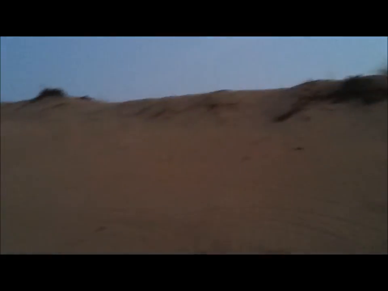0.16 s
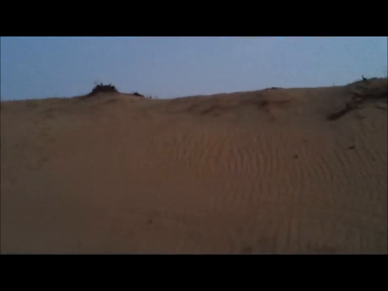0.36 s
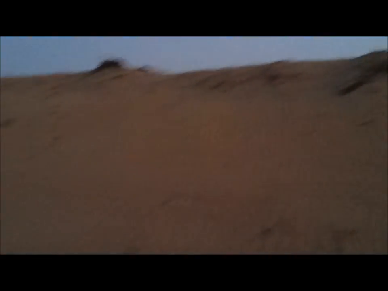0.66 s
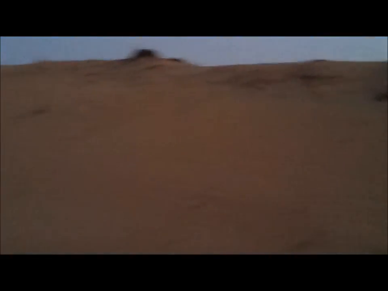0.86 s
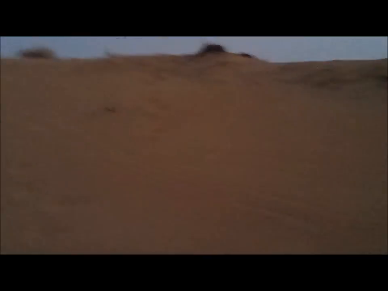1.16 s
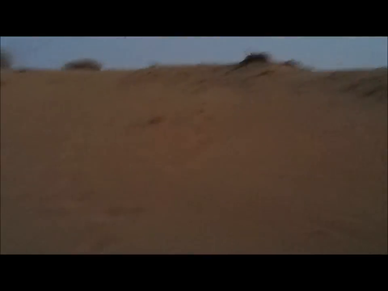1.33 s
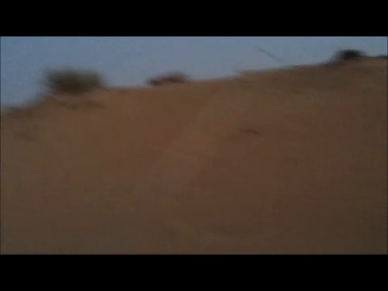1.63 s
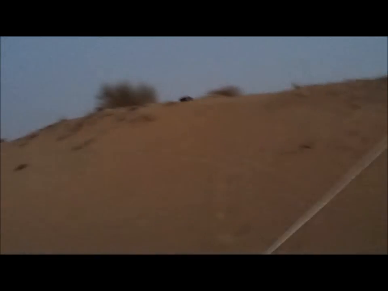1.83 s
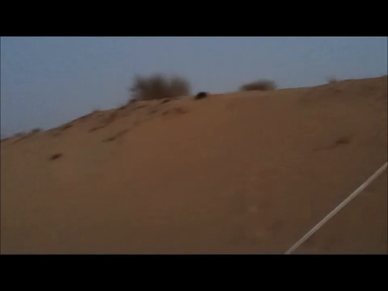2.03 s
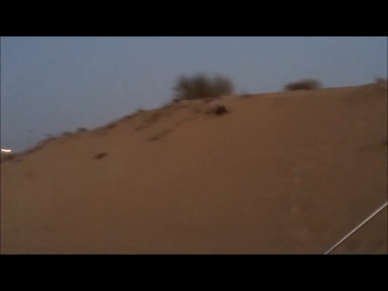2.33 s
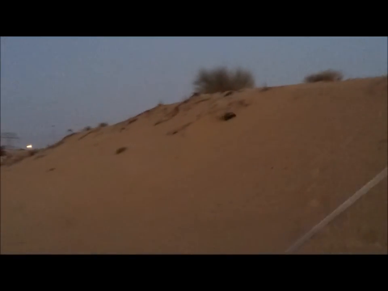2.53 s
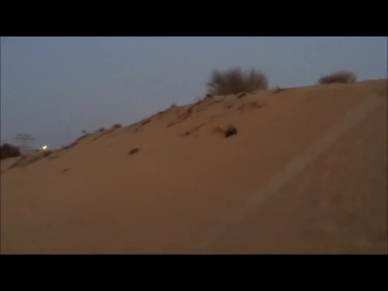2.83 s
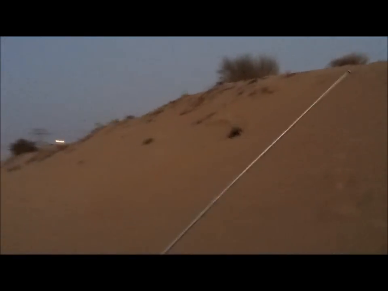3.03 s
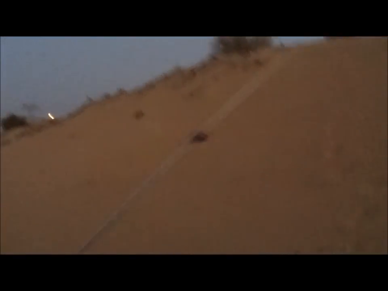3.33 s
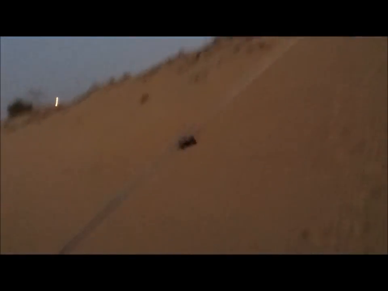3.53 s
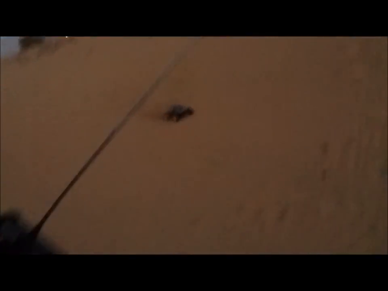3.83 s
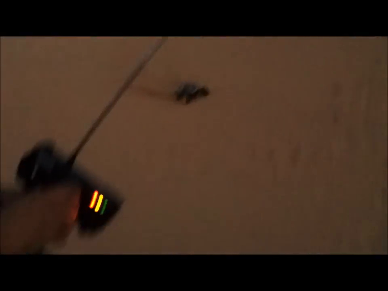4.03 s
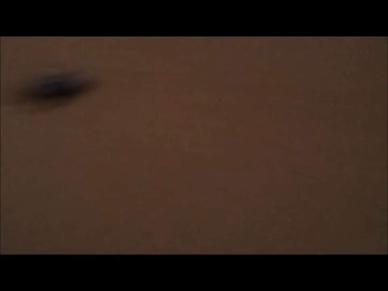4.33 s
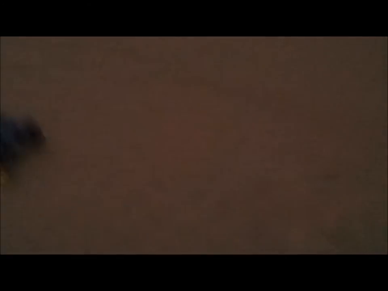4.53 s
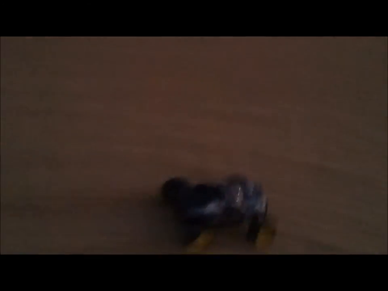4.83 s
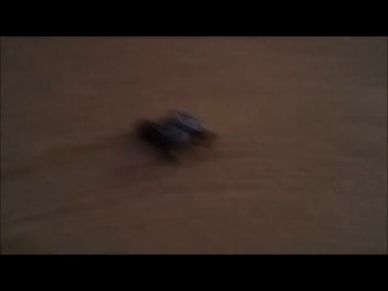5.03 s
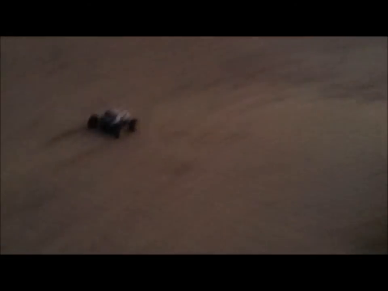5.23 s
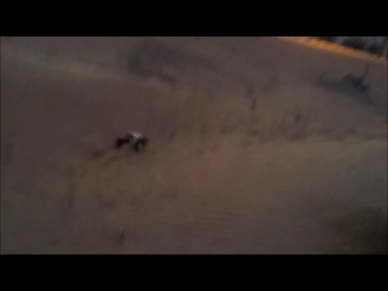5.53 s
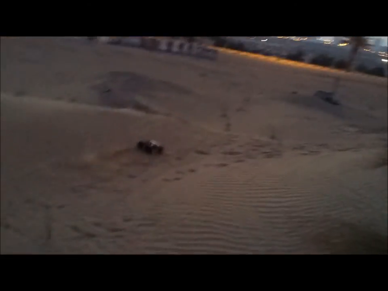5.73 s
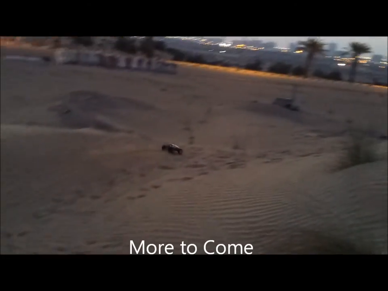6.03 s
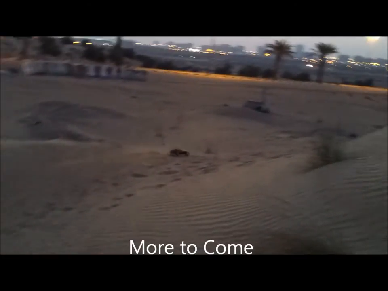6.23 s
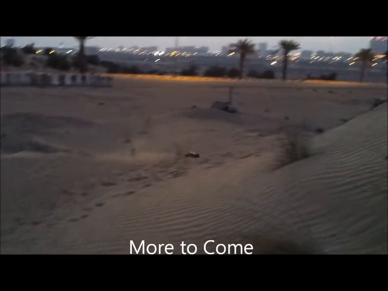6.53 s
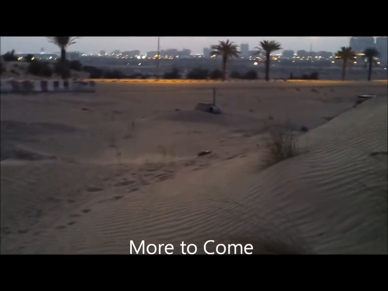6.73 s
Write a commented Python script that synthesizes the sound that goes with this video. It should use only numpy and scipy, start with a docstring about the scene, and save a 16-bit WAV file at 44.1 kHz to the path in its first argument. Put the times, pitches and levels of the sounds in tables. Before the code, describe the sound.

A toy truck with an electric motor runs over loose sand. At first heavy wind pops cover a weak whir; then the gears whine and hiss, growing into a harsh rush mixed with tyre noise. It coasts down with fine clicking, almost stops, and starts again quietly in stuttering bursts. Close hand-held stereo pickup, the gears brighter on the right, with light handling knocks and faint air hiss.

```python
"""Open sandy ground: a small electric toy truck spins up, rushes past, coasts and pulls away in bursts of throttle.
Gears are patchy noise plus a ringing band; mesh whine, squeaks and motor moan are narrow noise on moving pitches.
Tyres and chassis are two more noise bands. Gusts are lumpy low noise with pops on the two ports of a hand-held
camera; the left port muffles gears and whine. Grit clicks, case knocks and faint air noise complete the scene."""
import sys
import numpy as np
from scipy import signal
from scipy.fft import rfft, irfft, next_fast_len
from scipy.io import wavfile
from scipy.ndimage import uniform_filter1d, map_coordinates

SR = 44100
rng = np.random.default_rng(int(sys.argv[2]) if len(sys.argv) > 2 else 0)


def wav_out(sig):
    """Save sig, one row per channel (or a flat mono array), as 16-bit PCM at SR to the path in sys.argv[1]."""
    wavfile.write(sys.argv[1], SR, np.round(np.clip(np.atleast_2d(sig).T, -1, 1) * 32767).astype(np.int16))


N = 303187
T = np.arange(N) / SR


def amp(db):
    """Amplitude factor of a level in dB."""
    return 10 ** (np.asarray(db) / 20)


def unit(x):
    """Scaled so that the mean of the ports has rms 1."""
    return x / np.sqrt(np.mean(np.atleast_2d(x).mean(0) ** 2))


def along(points, hz):
    """(Hz, value) points interpolated on a log frequency axis."""
    f, v = np.transpose(points)
    return np.interp(np.log(hz + 1), np.log(f + 1), v)


def curves(rows):
    """One value per sample for each column after the time."""
    s, *cols = np.transpose(rows)
    return [np.interp(T, s, c) for c in cols]


def wobble(rate_hz, size=N):
    """A smooth random curve with rate_hz knots a second."""
    knots = rng.standard_normal(int(size * rate_hz / SR) + 4)
    return map_coordinates(knots, [T[:size] * rate_hz])


def filtered(x, response):
    """x times a complex response of frequency."""
    m = next_fast_len(N + SR // 4)
    return irfft(rfft(x, m) * response(np.fft.rfftfreq(m, 1 / SR)), m)[..., :N]


def sides(pan_db):
    """Left and right gains of constant summed power."""
    left = amp(pan_db)
    return 2 * np.array([left, left ** 0]) / np.hypot(1, left)


def tilt(half_db):
    """Left port up, right port down by half_db."""
    return amp([[half_db], [-half_db]])


def window(t0, t1, edge_s):
    """1 between t0 and t1, with sloped ends."""
    return np.clip(np.minimum(T - t0, t1 - T) / edge_s + .5, 0, 1)


def fuzzy(hz, width_hz):
    """Narrow noise of rms 1 on a moving pitch: a tone whose size and phase wander."""
    turn = 2 * np.pi * np.cumsum(hz) / SR
    in_phase = wobble(width_hz, size=len(hz)) * np.cos(turn)
    quadrature = wobble(width_hz, size=len(hz)) * np.sin(turn)
    return unit(in_phase + quadrature)


# Phase of the left port against the right. Each row: frequency in Hz, phase in radians (negative is late).
LAG = [(200, -.3), (1460, -1.2), (1890, -2.8), (2500, -3.1), (3530, -5), (14000, -13)]


def left_lag(hz):
    """Path difference between the ports as a phase factor."""
    return np.exp(1j * along(LAG, hz))


# Colouring of the left port. Each row: frequency in Hz, gain in dB.
MUFFLE = [(2000, 8), (3000, 1.5), (4200, -34), (5500, -19), (7500, -24), (9500, -34), (11000, -5.5),
          (14000, -7)]


def left_muffle(hz):
    """Treble loss at the left port."""
    return amp(along(MUFFLE, hz))


# Likeness of the ports. Each row: frequency in Hz, left-right likeness from 0 to 1.
ALIKE = [(300, 1), (700, 1), (1500, 0.75), (2500, 0.8), (3600, 0.8), (6000, .7), (11000, 0.4)]


def rush(spectrum, patchy_db, bins, frames):
    """Noise partly alike at both ports, the left late, with random gain patches over time and frequency."""
    z = signal.stft(rng.standard_normal((2, N)), nperseg=512)[2]
    field = uniform_filter1d(rng.standard_normal(z.shape[1:]), int(bins), 0)
    field = uniform_filter1d(field, int(frames), 1)
    patches = amp(patchy_db * field / field.std())
    shared, separate = signal.istft(z * patches, nperseg=512)[1][:, :N]

    def gain(hz):
        return amp(along(spectrum, hz))

    def alike(hz):
        return np.clip(along(ALIKE, hz), 0, 1)

    left = filtered(shared, lambda hz: gain(hz) * alike(hz) * left_lag(hz))
    left += filtered(separate, lambda hz: gain(hz) * np.sqrt(1 - alike(hz) ** 2))
    return np.array([left, filtered(shared, gain)])


# Truck loudness. Each row: time in seconds, gear hiss in dB, tyre rush in dB.
DRIVE = [(0, -48, -54), (.31, -46, -53), (.44, -53, -53), (.57, -40, -47), (.88, -34.5, -39),
         (1.15, -36.5, -42), (1.9, -29.5, -33.5), (2.14, -23, -30.5), (2.45, -17, -23.5), (2.6, -14, -22),
         (2.89, -18, -24.5), (2.95, -19.5, -32.5), (3.15, -25, -32.5), (3.55, -28.5, -38.5),
         (4.0, -33.5, -41.5), (4.13, -36, -46.5), (4.23, -48, -45.5), (4.46, -49, -46.5),
         (4.53, -56, -51.5), (4.73, -39.5, -47), (5.05, -44, -51), (5.3, -43, -58), (5.9, -44.5, -52.5),
         (5.98, -40.5, -50.5), (6.25, -45, -48.5), (6.31, -40, -48), (6.45, -45.5, -51), (6.87, -45, -51)]
# Lifted throttle. Each row: start in seconds, end in seconds, drop in dB.
LIFTS = [(4.842, 4.881, 10.5), (4.878, 4.91, 4), (5.225, 5.293, 14), (5.305, 5.344, 15), (5.342, 5.364, 3),
         (6.672, 6.726, 5.5)]


def gear_level_db():
    """Gear hiss level, sinking while the throttle is lifted."""
    drop_db = sum(db * window(t0, t1, 0.0086) for t0, t1, db in LIFTS)
    return curves(DRIVE)[0] - drop_db


# Shaft turning out of true. Each row: time in seconds, turns per second, flare in dB before random scaling.
SHAFT = [(.5, 50, 1), (1.0, 56, 2), (2.3, 57, 1), (2.8, 64, 2.5), (3.31, 63, 3), (3.55, 60.5, 2),
         (3.83, 57.5, 1.5), (4.2, 59, 1.5), (4.65, 39.5, 1.5), (5.13, 40.5, 3.5), (5.48, 47, 2.5),
         (6.09, 44.5, 3), (6.4, 47.5, 3.5), (6.87, 44.5, 2.5)]


def flare():
    """Mesh gain that swells once a shaft turn by an uneven amount."""
    rate_hz, depth_db = curves(SHAFT)
    turn = 2 * np.pi * np.cumsum(rate_hz * (1 + .06 * wobble(15))) / SR
    uneven = 0.5 + 0.39 * wobble(25)
    return amp(depth_db * uneven * np.cos(turn))


# Gear hiss spectrum. Each row: frequency in Hz, density in dB per Hz.
GEARS = [(2000, -57), (2700, -8), (4100, -5), (5500, -3.5), (6900, 3), (8400, 3), (10000, -8),
         (12400, -16.5), (14500, -14)]
# Truck facing camera. Each row: time in seconds, gears left-right in dB, chassis drone over the tyres in dB.
FACING = [(0, -14, -24), (.6, -20, -18), (2.2, -25, -2.5), (2.55, -6, -25), (2.9, -1.5, -12),
          (3.2, -6.5, -8), (4.2, -6, 4), (4.9, -11, -6.5), (6.87, -10, -17)]
# Gearbox resonance. Each row: time in seconds, centre in Hz, level over the hiss in dB.
RING = [(0, 7500, -32), (.6, 7600, -4.5), (.95, 8020, -2.5), (1.2, 7530, -11), (2.25, 7450, -26),
        (2.39, 6750, -1.5), (2.7, 7280, -39), (3.7, 7800, -25), (4.0, 6780, -5), (4.2, 7040, -25),
        (4.6, 6930, -27), (4.72, 7000, 1), (4.82, 7630, 2), (4.92, 6600, -1.5), (5.05, 6530, 2),
        (5.2, 6890, -2), (5.4, 7100, -11), (5.7, 7150, 2), (5.98, 7410, -6), (6.12, 6950, 1.5),
        (6.4, 7000, -7.5), (6.87, 6900, -4)]


def gears():
    """Uneven teeth chatter as patchy hiss; the gearbox rings in a broad drifting band."""
    chatter = flare() * amp(.8 * wobble(40) + 1.2 * wobble(300))
    hiss = chatter * rush(GEARS, patchy_db=3.1, bins=3, frames=5)
    ring_hz, ring_db = curves(RING)
    ring_tone = fuzzy(ring_hz + 130 * wobble(20), width_hz=850)
    ring = chatter * amp(2 * wobble(40) + ring_db) * ring_tone
    pan_db = curves(FACING)[0]
    out = amp(gear_level_db()) * (hiss / hiss[1].std() + ring) * sides(pan_db)
    out[0] = filtered(out[0], left_muffle)
    return out


# Tyre rush spectrum. Each row: frequency in Hz, density in dB per Hz.
TYRES = [(600, -2), (900, 1.5), (1250, 4), (1600, 3.5), (2000, 1), (2700, -5), (3600, -14), (6000, -17.5),
         (8000, -31)]
# Sand echo hollowing the far tyre rush. Each row: frequency in Hz, gain in dB.
GROUND = [(300, -3), (600, 8), (1150, -9.5), (1700, 5.5), (2300, 5), (4000, -9)]
FAR_FROM_S, FAR_FADE_S = 5.32, 0.29
TREAD_PATCHY_DB = 2.2


def tyres():
    """Tread blocks churn sand ripples: bumpy noise, comb-coloured by the sand echo once far off."""
    bumps = amp(0.53 * wobble(10) + 1.6 * wobble(120))
    churn = bumps * rush(TYRES, patchy_db=TREAD_PATCHY_DB, bins=1.5, frames=8)
    near = amp(curves(DRIVE)[1]) * unit(churn * tilt(1.8))
    hollow = filtered(near, lambda hz: amp(along(GROUND, hz)))
    far = np.clip((T - FAR_FROM_S) / FAR_FADE_S, 0, 1)
    return near + far * (hollow - near)


# Chassis drone spectrum. Each row: frequency in Hz, density in dB per Hz.
CHASSIS = [(250, -12.5), (500, -9), (700, 0.5), (850, -0.5), (1100, -36)]


def chassis():
    """Body drone: a low-mid noise band set against the tyre level."""
    level_db = curves(DRIVE)[1] + curves(FACING)[1]
    drone = rush(CHASSIS, patchy_db=TREAD_PATCHY_DB, bins=2.2, frames=13)
    return amp(level_db) * unit(drone * tilt(1.2))


# Buffeting. Each row: time in seconds, level in dB, left-right in dB.
WIND = [(0, -34, 28), (.3, -30.5, 22), (.52, -28, 18), (.8, -23, 11), (.89, -24.5, 10), (.93, -31.5, -6),
        (.99, -31.5, -1), (1.08, -28.5, 18), (1.27, -22, -3), (1.32, -37, 10), (1.52, -41, -6),
        (1.77, -25, 19), (1.88, -40.5, 7), (2.36, -30.5, 5), (2.58, -19, 14), (2.71, -24.5, 1),
        (2.765, -17.5, 8), (2.95, -24, 3), (2.99, -18.5, 15), (3.05, -28, 11), (3.085, -36, 5),
        (3.4, -45, -3), (3.95, -35.5, 1), (4.1, -45.5, 6), (4.65, -48.5, 3), (5.2, -47, 12.5),
        (6.1, -47, 0.5), (6.6, -42.5, 12), (6.87, -44.5, 9)]
# Puffs over the buffeting. Each row: centre in seconds, length in seconds, rise in dB.
PUFFS = [(2.12, 0.03, 15), (2.273, 0.046, 6.5), (4.253, 0.082, 13), (4.797, 0.15, 11.5), (4.994, 0.047, 12),
         (5.205, 0.034, 9), (5.273, 0.028, 13), (5.385, 0.086, 17), (5.472, 0.094, 8), (5.777, 0.22, 6),
         (6.409, 0.058, 4), (6.694, 0.12, 7.5)]
# Buffeting spectrum. Each row: frequency in Hz, density in dB per Hz.
GUST = [(20, -12), (50, 0), (80, 2.5), (120, 4.5), (250, -2.5), (400, -11), (700, -28), (1500, -94),
        (3000, -79)]
# Rumble spectrum. Each row: frequency in Hz, density in dB per Hz.
RUMBLE = [(20, -2.5), (40, 1.5), (90, 1.5), (160, -9), (300, -43), (600, -57)]
EDDY_DB, EDDY_HZ = 2, 14


def wind():
    """Turbulence: lumpy noise, separate at each port, over a steadier rumble, with pops."""
    base_db, pan_db = curves(WIND)
    puff_db = sum(rise_db * np.exp(-(2 * (T - s) / length_s) ** 2) for s, length_s, rise_db in PUFFS)
    db = base_db + puff_db
    lumps = amp(np.array([1.7 * wobble(22) + 3 * wobble(60) for _ in "LR"]))
    noise = filtered(lumps * rng.standard_normal((2, N)), lambda hz: amp(along(GUST, hz)))
    rumble = filtered(rng.standard_normal((2, N)), lambda hz: amp(along(RUMBLE, hz)))
    buffets = amp(db + EDDY_DB * wobble(EDDY_HZ)) * sides(pan_db) * noise / noise.std()
    # rumble follows only 0.27 of the wind's dB swing
    steady = amp(0.27 * db + [[-22], [-27]]) * rumble / rumble.std()
    return buffets + steady + pops(base_db)


# Air slapping a port. Each row: time in seconds, push in dB, snap over the push in dB, length in seconds,
# port (0 left, 1 right).
POPS = [(0.016, -7.5, -14.5, 0.0038, 0), (0.059, -20.5, -11.5, 0.013, 0), (0.094, -7, -24, 0.0024, 0),
        (0.115, -2.5, -12.5, 0.0034, 0), (0.161, -12, -34, 0.0096, 0), (0.2, -7.5, -17, 0.0016, 0),
        (0.221, -12, -29, 0.0034, 0), (0.248, -5.5, -20, 0.0022, 0), (0.27, -11.5, -31, 0.004, 0),
        (0.286, -8.5, -5.5, 0.0054, 0), (0.298, -14.5, -8, 0.0028, 0), (0.319, -9, -24, 0.0022, 0),
        (0.336, -0.5, -17.5, 0.0041, 0), (0.344, -2, -16, 0.0025, 0), (0.391, -10.5, -10, 0.0042, 0),
        (0.448, -4, -12.5, 0.0066, 0), (0.504, -5, -20, 0.002, 0), (0.578, -10, -12, 0.0055, 0),
        (0.602, -8, -22, 0.0034, 0), (0.622, -8, -11.5, 0.01, 0), (0.65, -12, -27, 0.0056, 0),
        (0.671, -3, -13, 0.0092, 0), (0.723, -10.5, -15.5, 0.012, 0), (0.784, -25.5, -0.5, 0.033, 0),
        (0.812, -12, -32, 0.017, 1), (0.824, -12.5, -11, 0.0029, 0), (0.878, -17, -1.5, 0.012, 0),
        (0.95, -12, -12, 0.0074, 1), (0.969, -2.5, -25, 0.0027, 1), (1.143, -7.5, -14, 0.0075, 1),
        (1.091, -22, -8.5, 0.0077, 0), (1.16, -14.5, -6, 0.01, 0), (1.188, -16, -8, 0.0064, 0),
        (1.213, -22, 2.5, 0.0031, 0), (1.234, -15, -10, 0.0049, 0), (1.261, -18.5, -9.5, 0.014, 0),
        (1.282, -13, -8.5, 0.0063, 0), (1.666, -16, -6, 0.0054, 0), (1.765, -15.5, -9, 0.01, 0),
        (2.517, -8.5, -6, 0.011, 0), (2.774, -15, -7, 0.022, 0), (2.807, -11, -8, 0.014, 0),
        (2.978, -14, -8.5, 0.0062, 1), (3.001, -15.5, -3, 0.0053, 0), (5.385, -22, -18, 0.0062, 0)]
SMALL_PER_S, RIGHT_SHARE = 12, 0.27
SMALL_DB, SMALL_SPREAD_DB, SMALL_SNAP_DB = 11, 2, -17  # SMALL_DB is over the wind level
SMALL_MEDIAN_S = 0.007


def all_pops(wind_db):
    """The listed pops plus random smaller ones as strong as the wind of the moment."""
    count = int(SMALL_PER_S * N / SR)
    u, g = rng.random((count, 2)), rng.standard_normal((count, 3))
    s = u[:, 0] * T[-1]
    push_db = np.interp(s, T, wind_db) + SMALL_DB + SMALL_SPREAD_DB * g[:, 0]
    snap_db = SMALL_SNAP_DB + SMALL_SPREAD_DB * g[:, 1]
    length_s = SMALL_MEDIAN_S * 1.8 ** g[:, 2]
    port = u[:, 1] < RIGHT_SHARE
    return np.vstack([POPS, np.transpose([s, push_db, snap_db, length_s, port])])


# Snap spectrum. Each row: frequency in Hz, density in dB per Hz.
SNAP = [(150, -20), (350, 0), (700, -5), (1000, -12), (1600, -21), (2300, -38), (4000, -60)]
WAKE_DB, WAKE_S = -6.5, 0.015  # slow swing after each pop, dB over the push
WAKE_BASE_HZ = 74  # times 0.6 to 1.6 at random


def pops(wind_db):
    """Each pop is a pressure push, a slow wake and a noise snap at one port."""
    out = np.zeros((2, N))
    snap = filtered(rng.standard_normal(N), lambda hz: amp(along(SNAP, hz)))
    for s, push_db, snap_db, length_s, port in all_pops(wind_db):
        pitch, phase = rng.random(2)
        near = slice(max(round((s - .05) * SR), 0), round((s + .05) * SR))
        t = T[near] - s
        swing = np.cos(2 * np.pi * ((150 + 120 * pitch) * t + 0.18 * phase))
        push = np.exp(-(t / (np.where(t < 0, .4, 1.1) * length_s)) ** 2) * swing
        after = np.maximum(t, 0)
        wake = np.sin(2 * np.pi * WAKE_BASE_HZ * (.6 + phase) * after)
        wake *= amp(WAKE_DB) * np.exp(-(after / WAKE_S) ** 2)
        # sharp front, slower tail
        burst = np.exp(-(t / (np.where(t < 0, .35, .75) * length_s)) ** 2) * snap[near]
        burst *= np.sqrt(length_s * SR / np.sum(burst ** 2))  # rms 1 over the pop length
        out[round(port), near] += amp(push_db) * (push + wake + amp(snap_db) * burst)
    return out


# Air noise spectrum. Each row: frequency in Hz, density in dB per Hz.
AIR = [(200, -51), (500, 5), (1700, -0.5), (3000, -7), (14000, -18.5)]


def evening_air():
    """Faint steady broadband noise of the evening air."""
    return amp(-52) * unit(rush(AIR, patchy_db=2, bins=6, frames=12))


# Drive squeaks. Each row: centre in seconds, pitch in Hz, length in seconds, level in dB.
SQUEAKS = [(0.22, 4960, 0.033, -42), (0.286, 4650, 0.042, -45), (0.323, 9200, 0.014, -37),
           (0.458, 4750, 0.017, -47), (0.027, 1720, 0.019, -53), (0.478, 1730, 0.042, -53),
           (0.51, 1980, 0.046, -51), (1.015, 4870, 0.063, -34.5), (1.157, 4930, 0.19, -33),
           (1.16, 6400, 0.33, -33.5), (3.119, 8570, 0.15, -28), (3.43, 8870, 0.1, -37)]


def squeaks():
    """Short drive squeaks: bell-shaped bursts of narrow noise."""
    out = np.zeros(N)
    for s, hz, length_s, db in SQUEAKS:
        near = slice(round((s - length_s) * SR), round((s + length_s) * SR))
        t = T[near] - s
        out[near] += amp(db) * np.exp(-(2 * t / length_s) ** 2) * fuzzy(hz + 0 * t, width_hz=.085 * hz)
    return out


# Mesh whine. Each row: time in seconds, pitch in Hz, level over the hiss in dB, octave over the hiss in dB.
WHINE = [(.5, 2701, -30, -25), (.535, 2910, -8, -12), (.552, 2990, 9, -9), (.562, 3100, -9, -5),
         (.585, 3590, -10, 4), (.605, 3880, -8, 2), (.63, 3930, 0, -3), (.7, 3920, -1.5, 1),
         (.8, 4200, -5, -12), (.86, 4150, -9, 4), (.95, 4280, -7, -13), (1.27, 4096, -11, 2.5),
         (2.2, 4064, -10, -40), (2.9, 3850, -15.5, -39), (4.1, 3865, -21, -20), (4.3, 3590, -27, -23.5),
         (4.9, 3110, -32, -18), (5.05, 3030, -16, 1), (5.21, 3390, -17, -6), (5.39, 3120, -10, -18),
         (5.5, 3270, -8, -6), (5.56, 3580, -11, 7.5), (5.76, 3650, -8, -2), (5.9, 3700, -16, -4),
         (6.07, 3750, -7, -4), (6.16, 3910, -8, -10), (6.26, 4170, -6, -15), (6.29, 3860, -1, -12),
         (6.36, 3850, -12, -20), (6.6, 3650, -5, -25), (6.7, 3600, -28, -30)]


def whine():
    """Gear mesh tone and octave; pitch wavers as wheels slip and grip, level as teeth load unevenly."""
    hz, db, octave_db = curves(WHINE)
    hz = hz * (1 + .01 * wobble(40))
    mesh = amp(db) * fuzzy(hz, width_hz=270)
    mesh += amp(octave_db) * fuzzy(2 * hz, width_hz=600)
    return mesh * amp(gear_level_db() + 2.6 * wobble(55))


# Pinion line at even speed. Each row: time in seconds, pitch in Hz, level over the hiss in dB.
PINION = [(2.749, 3850, -25), (2.95, 3810, -12), (3.299, 3785, -9.5), (3.7, 3830, -14), (4.1, 3870, -17),
          (4.2, 3740, -35)]


def pinion():
    """Thin steady mesh line of the pinion."""
    hz, db = curves(PINION)
    rolling = window(PINION[0][0], PINION[-1][0], .05)
    return amp(gear_level_db() + db) * rolling * fuzzy(hz, width_hz=180)


# Grit in the slowing gears. Each row: start in seconds, level in dB, ring in Hz.
GRIT = [(3.6504, -27, 7700), (3.665, -26, 8820), (3.6814, -22, 8890), (3.6992, -24, 8910),
        (3.7174, -20, 7550), (3.7803, -26, 8200), (3.8043, -27, 7900), (3.8215, -22, 8100),
        (3.8661, -35, 8230), (3.913, -23, 8380), (3.925, -26, 7740), (3.9649, -19, 8910),
        (3.981, -16.5, 8910), (3.9954, -20, 8500), (4.0253, -23, 7630), (4.0334, -27, 8880),
        (4.0516, -22, 8750), (4.0644, -27, 8910), (4.0814, -28, 8930), (4.0986, -26, 8870),
        (4.112, -29, 8670), (4.1295, -31, 9000), (4.1464, -30, 8980)]
GRIT_S, GRIT_BROAD_DB = 0.0024, -14


def grit():
    """Each click is a short bright ring over a broader spit of noise."""
    out, t = np.zeros(N), T[:SR // 50]
    for s, db, hz in GRIT:
        spit = np.diff(rng.standard_normal(len(t) + 1))
        shape = t / GRIT_S * np.exp(1 - t / GRIT_S)
        click = fuzzy(hz + 0 * t, width_hz=580) + amp(GRIT_BROAD_DB) * spit
        out[round(s * SR):][:len(t)] += amp(db) * shape ** 2 * click
    return out


def drive_tones():
    """Squeaks, whine, pinion and grit at both ports, the left muffled and late."""
    mesh = squeaks() + whine() + pinion() + grit()
    left = filtered(mesh, lambda hz: left_muffle(hz) * left_lag(hz))
    return np.array([left, mesh])


MOAN_S, MOAN_HZ, MOAN_DB = (4.22, 4.46), (1060, 1170), -43.5


def moan():
    """Braking motor: narrow noise sliding upward in broken pieces."""
    hz = np.interp(T, MOAN_S, MOAN_HZ) * (1 + .06 * wobble(30))
    broken = amp(MOAN_DB + 2.5 * wobble(45)) * window(*MOAN_S, .02)
    return broken * fuzzy(hz, width_hz=360) * tilt(1.8)


def thud(hz, length_s, rattle_share):
    """Damped case swing with a crunchy rattle, peak 1."""
    t = T[:SR // 12]
    band = signal.butter(4, [600 / SR, 3600 / SR], "band")  # 300 to 1800 Hz
    rattle = signal.lfilter(*band, rng.standard_normal(len(t)))
    swing = np.sin(2 * np.pi * hz * t) * np.exp(-t / length_s)
    x = (swing + rattle_share * rattle) * np.exp(-(t / length_s) ** 2) * (1 - np.exp(-t / 0.0009))
    return x / abs(x).max()


# Knocks on the case, and last a slap of air at the left port. Each row: start in seconds, peak in dB before
# panning, pitch in Hz, length in seconds, # rattle share, left-right in dB.
KNOCKS = [(4.471, -28.5, 800, 0.012, 0.57, 0), (4.651, -24, 314, 0.004, 0.25, 26),
          (5.841, -30, 905, 0.017, 1, -6), (6.081, -25.5, 541, 0.026, 1.4, 2.0),
          (6.789, -34.5, 928, 0.012, 1.7, 3), (6.866, -11.5, 255, 0.0039, 0.29, 29)]


def handling():
    """Knocks travel through the hand-held case to both ports; the final event is a slap of air at the left
    port."""
    out = np.zeros((2, N + SR))
    for s, peak_db, hz, length_s, rattle_share, pan_db in KNOCKS:
        x = thud(hz, length_s, rattle_share)
        gains = amp(peak_db) * sides(pan_db)[:, None] / np.sqrt(2)  # centred knock: peak_db at each port
        out[:, round(s * SR):][:, :len(x)] += gains * x
    return out[:, :N]


def scene():
    """Truck, wind, air and handling summed at the two ports."""
    truck = gears() + tyres() + chassis() + drive_tones() + moan()
    return truck + wind() + evening_air() + handling()


TOP_HZ = 14567


def record(dry):
    """Preamplifier hiss, a ceiling with a tight knee, then the band limit."""
    x = dry + amp(-52.5) * rng.standard_normal(dry.shape)
    x = x / (1 + abs(x) ** 8) ** (1 / 8)
    return filtered(x, lambda hz: hz < TOP_HZ)


dry = scene()
out = record(dry)
wav_out(out)
```